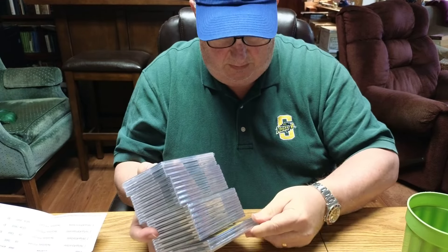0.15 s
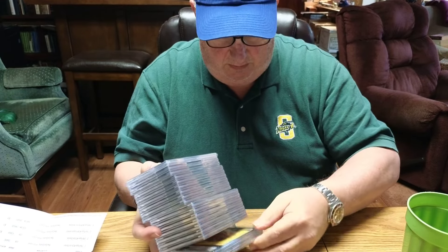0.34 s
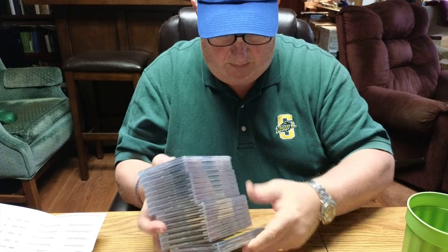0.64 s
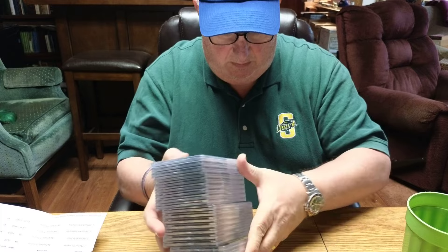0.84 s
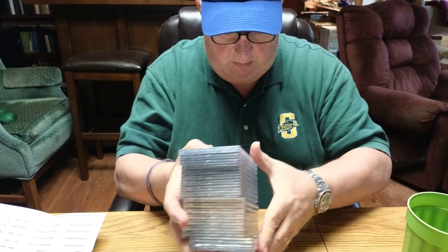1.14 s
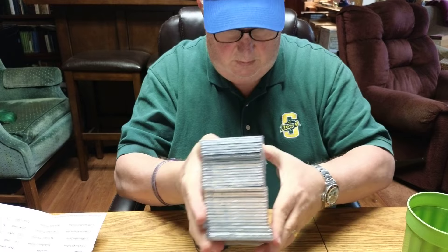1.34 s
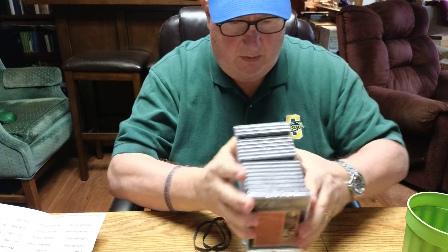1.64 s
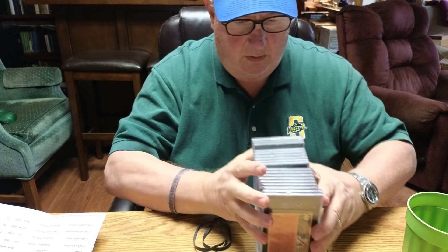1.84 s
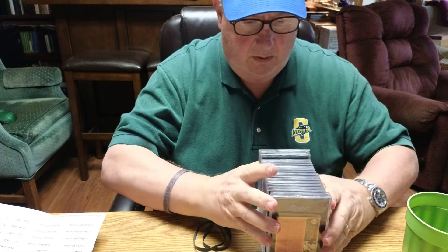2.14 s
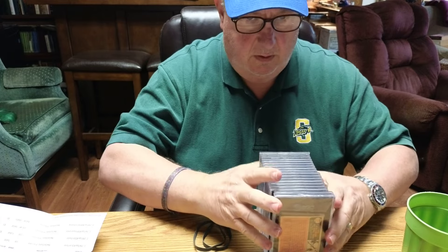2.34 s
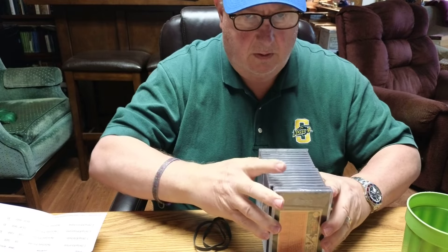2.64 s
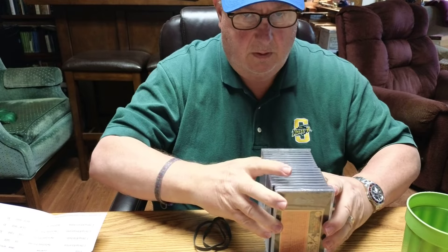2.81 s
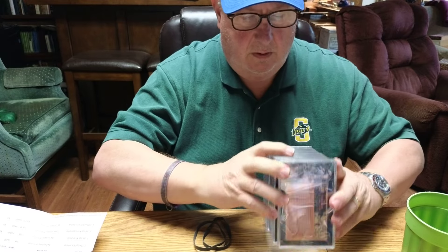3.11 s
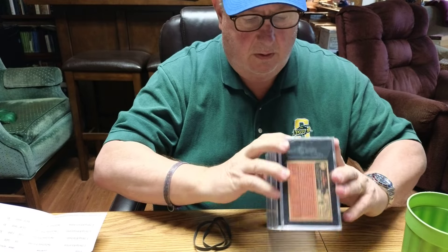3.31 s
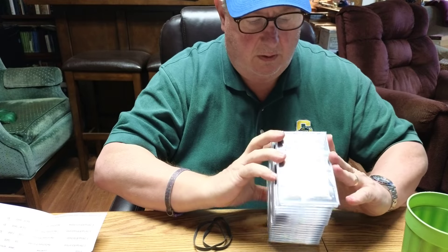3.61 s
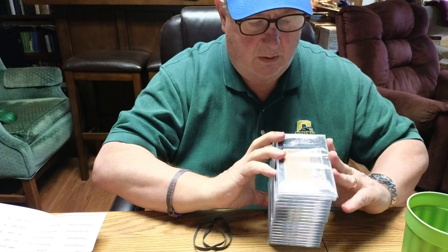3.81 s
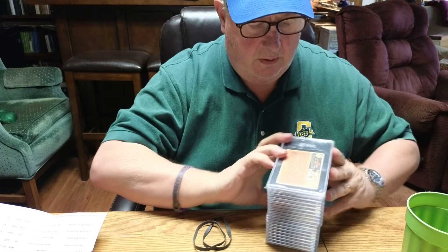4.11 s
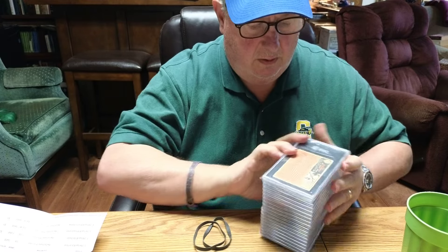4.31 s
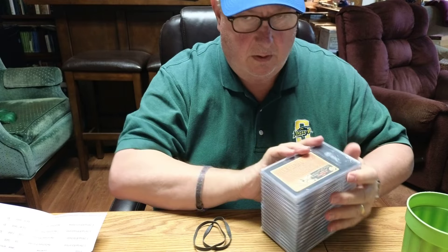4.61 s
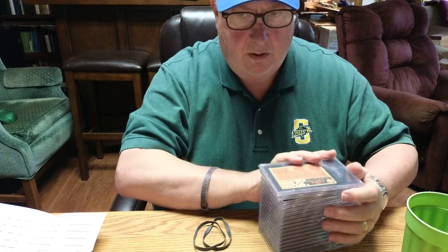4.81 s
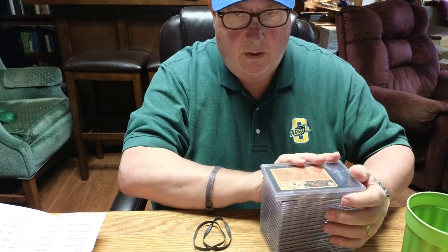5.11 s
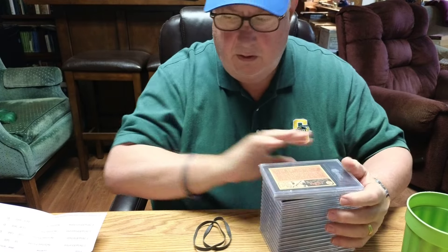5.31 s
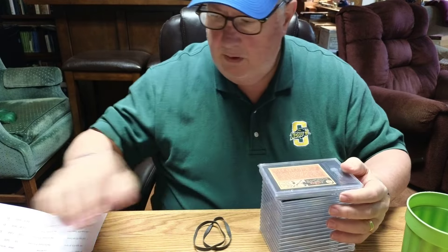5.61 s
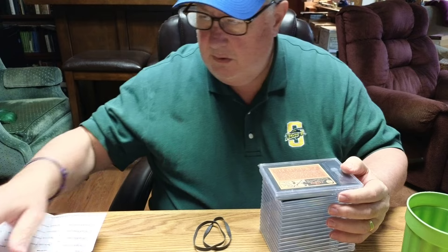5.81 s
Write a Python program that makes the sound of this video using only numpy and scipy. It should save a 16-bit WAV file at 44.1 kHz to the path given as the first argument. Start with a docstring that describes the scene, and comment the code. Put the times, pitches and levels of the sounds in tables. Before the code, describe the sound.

Rigid plastic cases tick and rattle as fingers square the stack. A bright clack comes early, several solid knocks on wood follow, then grainy drags across the tabletop. After a quieter spell of rubbing and clicks, the stack is set down hardest, with a deep thud. Faint taps and a whisper of paper end it. Quiet room noise with slight hum, short reverberation, table-mounted microphone.

```python
"""A stack of hard plastic card holders is squared, knocked and slid on a wooden table in a furnished room.
Ticks and knocks open; hard knocks come at 1.9-2.3 s, with a short creak between them near 2.17 s.
Slides follow at 2.4-2.8 s and 3.05-3.6 s, the heaviest knock at 4.7 s, a sliding sheet of paper from 5.7 s.
Contacts tick at case edges, ring plates and stack, and thump the table top, which carries the microphone.
Throughout, fingers rub the cases, forearms shift on the table and something hums faintly in the room noise."""
import sys
import numpy as np
from scipy import signal
from scipy.fft import rfft, irfft, next_fast_len
from scipy.io import wavfile
from scipy.ndimage import uniform_filter1d, map_coordinates

SR = 44100
rng = np.random.default_rng(int(sys.argv[2]) if len(sys.argv) > 2 else 0)


def inscribe(sig):
    """Save sig as 16-bit PCM at rate SR to the path in sys.argv[1].

    A 1-D sig is mono; a 2-D sig holds one channel per row.
    Samples are clipped to [-1, 1] before scaling.
    """
    pcm = np.round(np.clip(np.atleast_2d(sig).T, -1, 1) * 32767)
    wavfile.write(sys.argv[1], SR, pcm.astype(np.int16))


N = 262392

# stack or case knocks on table or pile: (time [s]; level over 10 ms of corner, edge, plate, stack, table [dB];
# favoured plate pitch [Hz], favoured stack pitch [Hz], contact length [s])
KNOCKS = [(0.0333, -61, -41, -40, -68, -47.5, 1840, 1390, .004),
          (0.048, -62, -62, -44, -44.5, -55, 1780, 1130, .008),
          (0.0596, -59, -53, -63, -43, -73, 1730, 330, .004),
          (0.814, -36.5, -30, -26, -23, -34.5, 2000, 545, .003),
          (0.885, -81, -63, -54.5, -41, -61, 3010, 467, .0045),
          (0.9079, -82, -65, -48.5, -49.5, -72, 2110, 320, .0045),
          (1.2082, -97, -72, -63, -54, -91, 1810, 615, 0.0061),
          (1.2182, -88.5, -63.5, -54, -45, -81.5, 1652, 570, .0045),
          (1.868, -95, -81, -53.5, -50, -69.5, 1600, 894, .006),
          (1.8883, -56.5, -44.5, -30, -14, -21.5, 1590, 1193, .0022),
          (1.966, -66, -53, -49.5, -24.5, -27, 1610, 486, .003),
          (2.0303, -59, -51.5, -27.5, -14, -17.5, 1560, 540, .0033),
          (2.049, -61.5, -46, -46, -29.5, -26.5, 2033, 555, .002),
          (2.1308, -81.5, -63, -58, -51.5, -46, 2190, 427, .006),
          (2.2473, -61, -47, -38, -44, -49, 3420, 1400, .004),
          (2.2684, -62.5, -43, -40, -26.5, -66, 1750, 1290, .002),
          (2.2725, -58.5, -53, -23.5, -16, -20, 1670, 980, .004),
          (2.3077, -71, -53.5, -52, -35.5, -51, 1670, 610, .005),
          (2.544, -63, -60.5, -66.5, -47, -27, 1640, 260, .0035),
          (2.6116, -66, -53.5, -73.5, -44, -31.5, 4480, 260, .006),
          (3.4142, -64, -44.5, -55, -37, -60, 1530, 920, .004),
          (4.0001, -74, -51, -51, -57.5, -62, 1920, 330, .005),
          (4.073, -80, -48.5, -35, -35.5, -76, 2010, 822, .006),
          (4.52, -87.5, -68.5, -60, -56.5, -58.5, 2630, 940, .012),
          (4.5522, -81, -70, -59.5, -57, -64, 1710, 895, .008),
          (4.657, -88.5, -70.5, -55.5, -55, -69.5, 2294, 600, 0.012),
          (4.6787, -50, -39, -26, -22.5, -33.5, 2207, 402, .0035),
          (4.7327, -40, -27.5, -18.5, -17, -10.5, 2300, 375, .0033),
          (4.7868, -62.5, -50, -45, -37, -49, 1800, 259, .005),
          (5.208, -59, -51, -37.5, -40, -44.5, 1980, 745, .005),
          (5.2382, -80, -61, -48.5, -52, -48.5, 1950, 610, .0045),
          (5.299, -79, -54, -37.5, -42.5, -61, 2780, 704, .005)]
# case edges tick, the one at 2.874 s a faint repeat of the 2.851 s tick: (time [s]; level over 10 ms of edge,
# corner, plate [dB]; favoured plate pitch [Hz])
TICKS = [(0.0046, -44.5, -60.5, -52.5, 1600), (0.015, -55, -76, -49, 1630),
         (0.0301, -31, -45.5, -42.5, 1850), (0.0969, -59.5, -64, -57.5, 1750),
         (0.1897, -79, -83, -60, 2120), (0.475, -51.5, -67, -65, 1730), (0.4832, -41, -46.5, -54.5, 1550),
         (0.738, -61.5, -83, -50, 1614), (0.796, -61.5, -74.5, -61.5, 3600),
         (1.315, -70, -72.5, -73.5, 4300), (1.5383, -57.5, -100.5, -52, 2290),
         (1.7028, -59, -88.5, -81, 4480), (1.745, -81.5, -100, -68, 1690),
         (1.918, -51.5, -59.5, -57.5, 1550), (2.1012, -58, -72, -56, 1480), (2.1089, -62.5, -81, -58, 1840),
         (2.3346, -56, -76, -76, 1640), (2.461, -51.5, -69, -84, 4240), (2.6489, -59, -85.5, -79, 4450),
         (2.6834, -56.5, -74.5, -78.5, 4420), (2.8507, -45, -51, -75.5, 3700),
         (2.874, -61, -68.5, -70.5, 4310), (3.5121, -63.5, -80.5, -85, 1600),
         (3.8907, -70.5, -69, -82.5, 1910), (3.9086, -43.5, -40.5, -91, 3450),
         (3.948, -47.5, -45, -67.5, 3480), (4.265, -52, -65.5, -72, 4260), (4.2697, -54, -64, -68, 4480),
         (4.5357, -52.5, -64, -60, 2970), (5.131, -73.5, -86, -63.5, 1700), (5.1643, -51, -64, -81, 4490),
         (5.1807, -41, -52, -66, 4530), (5.4, -41.5, -46.5, -66.5, 4320), (5.6472, -61, -58, -82, 2954),
         (5.7416, -65.5, -74, -74.5, 1590), (5.7742, -57, -56, -80.5, 2800),
         (5.8467, -64.5, -60.5, -69, 3230), (5.93, -64.5, -83.5, -59, 2800)]
# resonances of table top, stack, plates, edges, corners: (frequency [Hz], width [Hz], relative level [dB])
TABLE_MODES = [(35.2, 12, -17), (103.4, 18, 3.5), (128, 25, 2.5), (255, 110, -4.5)]
STACK_MODES = [(346, 150, 1), (536.4, 56, -1), (624, 67, 1.5), (753, 19, 1.5), (914, 130, -4),
               (1270, 99, 1.5), (1400, 53, -5.5)]
PLATE_MODES = [(1605, 350, 1.5), (1728.5, 220, 3), (1998, 110, -3), (2176, 84, -4), (2660, 200, -9),
               (3054, 360, -0.5), (3260, 200, 2.5), (3600, 250, -6), (4250, 300, 1)]
EDGE_MODES = [(4560, 230, 3.5), (5520, 4000, 2), (6200, 1800, -0.5), (6800, 930, -3), (8330, 2000, 6.5)]
CORNER_MODES = [(9775, 470, 5), (12200, 1000, 2), (14100, 720, -8.5)]
# table frame, booms under heavy knocks: (frequency [Hz], width [Hz], relative level [dB])
FRAME_MODES = [(96, 18, -0.5)]
FRAME_WAKE_DB, FRAME_GROW_DB_PER_DB = -16, 2.6  # knock level where the frame gain is 0 dB; its growth
KNOCK_EDGE_HZ = 5700
KNOCK_NARROW_DB_PER_OCT, BROADER_PER_DB = 2, 0.3873  # focus at 0 dB; heavier knocks spread wider
TICK_NARROW_DB_PER_OCT, TICK_S, TICK_RATTLE_S = 13, .0016, .006
TICK_EDGE_HZ, DULLER_HZ_PER_DB = 7800, 90  # at corner = edge level; lower as the corner weakens
TICK_STACK_DB, TICK_STACK_HZ = -11, 450  # level relative to the plate


def contacts():
    """Each contact ticks at corners and edges, rattles plates and stack; a knock also gives the table one soft push."""
    size = 16384
    hz = np.fft.rfftfreq(size, 1 / SR)
    cases, table = np.zeros((2, N + size))
    rows = []
    for s, corner_db, edge_db, plate_db, stack_db, _, plate_hz, stack_hz, length_s in KNOCKS:
        levels_db = [corner_db, edge_db, plate_db, stack_db]
        narrow_db = KNOCK_NARROW_DB_PER_OCT - BROADER_PER_DB * max(stack_db, plate_db)
        rows.append((s, levels_db, KNOCK_EDGE_HZ, plate_hz, stack_hz, narrow_db, length_s, .7 * length_s))
    for s, edge_db, corner_db, plate_db, plate_hz in TICKS:
        levels_db = [corner_db, edge_db, plate_db, plate_db + TICK_STACK_DB]
        edge_hz = TICK_EDGE_HZ + DULLER_HZ_PER_DB * (corner_db - edge_db)
        rows.append((s, levels_db, edge_hz, plate_hz, TICK_STACK_HZ,
                     TICK_NARROW_DB_PER_OCT, TICK_RATTLE_S, TICK_S))
    for row, draw in zip(rows, rng.standard_normal((len(rows), 5, size))):
        s, levels_db, edge_hz, plate_hz, stack_hz, narrow_db, rattle_s, tick_s = row
        tick, rattle = burst(draw[0], tick_s), burst(draw[1], rattle_s)
        corner = modes(CORNER_MODES)(hz) * small(hz, 9000) * soft(hz, 16000) * tick
        edge = struck(EDGE_MODES, edge_hz, narrow_db, draw[2], hz)
        edge = edge * small(hz, 5700) * soft(hz, 1.8 * edge_hz) ** 2 * tick
        plate = struck(PLATE_MODES, plate_hz, narrow_db, draw[2, 10:], hz) * soft(hz, 5800) * rattle
        stack = struck(STACK_MODES, stack_hz, narrow_db, draw[2, 20:], hz) * soft(hz, 2500) * rattle
        ring = sum(map(sized, [corner, edge, plate, stack], levels_db))
        cases[round(s * SR):][:size // 2] += ring + clatter(draw[3:], levels_db, hz)
    for s, table_db in np.array(KNOCKS)[:, [0, 5]]:
        frame = amp(FRAME_GROW_DB_PER_DB * (table_db - FRAME_WAKE_DB)) * modes(FRAME_MODES)(hz)
        thump = (modes(TABLE_MODES)(hz) - frame) * soft(hz, 330)
        table[round(s * SR):][:size // 2] += sized(thump, table_db)
    return cases[:N], table[:N]


def struck(table, spot_hz, narrow_db, scatter, hz):
    """Resonances strongest near the favoured pitch; broad blows press the cases together and damp them."""
    narrow_db = max(narrow_db, 2)
    centre, width, db = np.transpose(table)
    octaves = np.abs(np.log2(centre / spot_hz))
    nearest = .7 * np.exp(-(octaves / .12) ** 2)  # the mode under the spot stands out
    found_width = width * (10 / narrow_db) ** 0.43
    found_db = db + narrow_db * (nearest - octaves) + 2.1 * scatter[:len(db)]
    return modes(np.transpose([centre, found_width, found_db]))(hz)


def burst(draw, length_s):
    """Spectrum of many tiny impacts that swell at once and die away, chance peaks partly evened out."""
    u = np.arange(len(draw)) / SR / max(length_s / 3.1, .00005)
    spectrum = rfft(draw * np.sqrt(u) * np.exp(-u))
    return spectrum / np.abs(spectrum) ** .4


# centres of the corner, edge, plate, stack ranges: (frequency [Hz])
CLATTER_HZ = [12000, 6200, 2500, 750]
CLATTER_DB, CRACK_DB = -7.5, -7.5  # relative to the scaled contact level
CLATTER_T60_S, LONGER_PER_DB, MORE_PER_DB = 0.2, .01, 0.12  # at 0 dB; light contacts: shorter, weaker


def clatter(draw, levels_db, hz):
    """A broad crack, then loose cases chatter in uneven grains, coloured like the struck parts without peaks."""
    t = np.arange(len(hz) - 1) / SR
    total_db = 10 * np.log10(np.sum(amp(levels_db) ** 2))
    per_hz = [(c, db - 10 * np.log10(c)) for c, db in zip(CLATTER_HZ, levels_db)][::-1]
    colour = amp(along(per_hz, hz)) * np.abs(small(hz, 200)) / (1 + (hz / 14000) ** 6)
    t60_s = CLATTER_T60_S * np.exp(LONGER_PER_DB * total_db)
    uneven_db = 4 * np.repeat(draw[1, :len(t) // 64], 64)
    grains = amp(uneven_db - 60 * t / t60_s) * (1 - np.exp(-t / .003))
    crack = t * np.exp(-t / 0.00075)
    onset = np.minimum(np.arange(len(draw[0])) / SR / 0.00099, 1) ** 2

    def shaped(envelope):
        """Coloured noise under an envelope, its onset softened."""
        coloured = irfft(rfft(draw[0, :len(t)] * envelope, len(draw[0])) * colour)
        return rfft(coloured * onset)

    share_db = (1 + MORE_PER_DB) * total_db
    return sized(shaped(grains), share_db + CLATTER_DB) + sized(shaped(crack), share_db + CRACK_DB)


# stack on wood, one list per slide: (time [s], pressure [dB], speed [cm/s])
SLIDES = [
    [(2.4, -53, 5), (2.42, -62.5, 3.1), (2.508, -36, 5.4), (2.544, -35.5, 7.5), (2.6, -40, 11.5),
     (2.63, -46, 9.4), (2.692, -40.5, 3.6), (2.734, -55.5, 2.7), (2.78, -72, 4)],
    [(3.05, -66, 4.3), (3.092, -52, 3), (3.114, -35, 3.5), (3.172, -39.5, 10.6), (3.268, -35.5, 22.2),
     (3.34, -39, 16.1), (3.4, -40.5, 16.3), (3.466, -38, 16.4), (3.526, -49, 8), (3.58, -80, 6)],
]
# table boom, lower stack, upper stack, low plate, high plate: (level [dB])
PART_DB = [2.5, -1, 3.5, 0, -2.5]
GRAINS_PER_CM = 40
UNDER_DB, OVER_DB, CURVE = 5, 8.5, 1.5  # loss one octave under/over the grain rate; power of octaves


def slides():
    """Wood grain drags at the stack: slow sliding shakes the table, faster reaches higher resonances."""
    fade, (pressure_db, speed_cm_s) = strokes(SLIDES)
    catch_db = pressure_db + 1.13 * wobble(90)
    parts = [TABLE_MODES[1:3], TABLE_MODES[3:] + STACK_MODES[:2], STACK_MODES[2:],
             PLATE_MODES[:4], PLATE_MODES[4:8]]
    grain_hz = np.maximum(speed_cm_s * GRAINS_PER_CM, 1)
    out = 0
    for part, part_db in zip(parts, PART_DB):
        octaves = np.log2(np.mean(part, axis=0)[0] / grain_hz)
        reach_db = -np.where(octaves > 0, OVER_DB, UNDER_DB) * np.abs(octaves) ** CURVE
        gain = amp(catch_db + part_db + reach_db + 1.1 * wobble(25.14))
        out = out + gain * noise(lambda f: np.abs(modes(part)(f) * soft(f, 1.01 * part[-1][0])) ** 0.81)
    return fade * out


# fingers and cases rub: (peak time [s], swell [s], fade [s], level [dB], brightness [-5 dull to 5 bright, clipped])
RUBS = [(0.334, 0.11, .1, -82.5, 9), (0.7, 0.29, 0.18, -71.5, 7), (0.758, .04, .1, -67, -3.5),
        (0.921, 0.014, 0.063, -59.5, -4), (1.031, 0.062, 0.059, -45.5, 3.5), (1.195, 0.041, 0.037, -73, 0),
        (1.25, .05, .07, -74, 0.5), (1.56, 0.017, .06, -57.5, -15.5), (1.63, 0.25, .1, -72, -1.5),
        (1.93, 0.1, .1, -57.5, 7.5), (2.06, 0.032, .09, -59.5, 2), (2.15, .15, .12, -62, -1.5),
        (2.468, 0.007, 0.089, -61, 6.5), (2.6, .22, 0.16, -51.5, 9), (3.3, 0.16, .2, -54, 15),
        (3.41, 0.06, .26, -60, 4.5), (3.631, 0.024, 0.073, -44.5, 8.5), (3.94, .05, 0.077, -52.5, 8),
        (4.715, .1, .05, -43.5, -2), (5.14, .02, 0.03, -64, 1.5), (5.19, 0.051, .05, -55, 7.5)]
# base colour of rubbing: (frequency [Hz], relative level per Hz [dB])
SKIN = [(880, -18.5), (1500, -5), (2660, -25.5), (3150, -8), (3690, -22.5), (4590, -14), (5280, -9),
        (12700, -20.5), (16000, -50)]
# depth of the random bands in rubbing: (frequency [Hz], depth [dB])
BANDING = [(1000, 8), (4000, 7), (8000, 5), (14000, 2)]


def rubs():
    """Skin and plastic catch and let go: grainy hiss whose narrow bands come and go."""
    gains = np.array([swell(*row[:4]) for row in RUBS])
    gain = gains.sum(axis=0)
    brightness = np.clip(.5 + np.array(RUBS)[:, -1] / 10, 0, 1)
    share = brightness @ gains / (gain + 1e-12)
    body = modes(STACK_MODES[2:] + PLATE_MODES + EDGE_MODES[:2])
    high = noise(lambda f: amp(along(SKIN, f)) * f / 8000)
    low = noise(lambda f: amp(along(SKIN, f)) * np.abs(body(f)))
    z = signal.stft(np.sqrt(share) * high + np.sqrt(np.abs(1 - share)) * low, nperseg=256)[2]
    field = uniform_filter1d(rng.standard_normal(z.shape), size=3, axis=0)
    field = uniform_filter1d(field, size=16, axis=1)
    depth_db = along(BANDING, np.fft.rfftfreq(256, 1 / SR))[:, None]
    banded = signal.istft(z * amp(depth_db * unit(field)), nperseg=256)[1][:N]
    grains = amp(2.5 * wobble(250) + 1.5 * wobble(40))
    return gain * unit(grains * banded)


CREAK_START_S, CREAK_END_S, SLIPS_PER_S, SLIP_DB = 2.158, 2.192, 175, -57  # median level per slip


def creak():
    """Two cases stick and slip: a short uneven run of ticks through edges and plates."""
    hz = np.fft.rfftfreq(2048, 1 / SR)
    edge = modes(EDGE_MODES)(hz) * small(hz, 4000) * soft(hz, 12000)
    slip = sized(edge + 1.507 * modes(PLATE_MODES[::3])(hz), SLIP_DB)
    times = np.arange(CREAK_START_S, CREAK_END_S, 1 / SLIPS_PER_S)
    draw = rng.standard_normal((len(times), 2))
    slips = np.zeros(N)
    slips[((times + .0006 * draw[:, 0]) * SR).astype(int)] = amp(2.5 * draw[:, 1])
    return signal.fftconvolve(slips, slip)[:N]


# a hand pushes a sheet: (time [s], level [dB])
PAPER = [
    [(5.68, -78.5), (5.714, -77.5), (5.926, -63), (5.932, -64.5), (5.95, -51.5)],
]
# resonances of the sheet: (frequency [Hz], width [Hz], relative level [dB])
SHEET_MODES = [(1270, 57, -4), (1600, 60, -1), (2730, 100, -3), (3240, 64, 0), (3980, 50, -2),
               (4660, 72, -9), (6500, 2000, -16)]


def paper():
    """The sheet sings faintly in narrow bands as it slides."""
    fade, (level_db,) = strokes(PAPER)
    return fade * amp(level_db + 2.8 * wobble(50)) * noise(modes(SHEET_MODES))


# forearms and heavy knocks rock the table: (peak time [s], level [dB], fade [s])
ARMS = [(0.14, -42.5, 0.16), (0.4, -60, 0.34), (0.83, -40.5, 0.1), (1.13, -58.5, 0.21), (1.34, -55.5, 0.11),
        (1.9, -39, 0.29), (2.07, -29.5, .13), (2.27, -44.5, .1), (2.55, -59, .2), (2.7, -55.5, .13),
        (3.98, -41.5, 0.3), (4.74, -22.5, 0.1), (4.91, -51, .2), (5.22, -63, .5), (5.82, -70.5, .2)]
ARM_SWELL_S, ARM_REST_DB = .07, -74


def arms():
    """Slow rocking reaches the microphone through its stand."""
    rocking = noise(lambda f: (f / 25) ** 2 / (1 + (f / 35) ** 4))
    swells = sum(swell(s, ARM_SWELL_S, fade_s, db) for s, db, fade_s in ARMS)
    return (amp(ARM_REST_DB) + swells) * rocking


# room and microphone noise: (frequency [Hz], relative level per Hz [dB])
AIR = [(12, -25), (20, -16), (77, -12.5), (128, -5.5), (351, -6), (416, -6.5), (465, -7.5), (1140, -21),
       (1390, -19.5), (3940, -32.5), (7100, -32), (14700, -54), (16500, -47.5)]
# narrow hum: (frequency [Hz], width [Hz], level [dB])
HUM = [(132, 5.8, -67.5), (448, 7.7, -80.5)]
AIR_DB = -66


def air():
    """Gently wavering room noise with a faint hum of narrow noise bands."""
    hum = sum(amp(db) * noise(modes([(hz, width_hz, 0)])) for hz, width_hz, db in HUM)
    return amp(AIR_DB + 1.2 * wobble(2.7)) * noise(lambda f: amp(along(AIR, f))) + hum


WALL_DELAY_S, WALL_DB = 0.019, -18.5


def wall(x):
    """A hard surface nearby returns one delayed, bass-less copy."""
    return filtered(x, lambda f: amp(WALL_DB) * f / (f + 4000) * np.exp(-2j * np.pi * f * WALL_DELAY_S))


# reverberation: (frequency [Hz], t60 [s])
ROOM = [(100, 0.32), (400, 0.11), (1100, 0.1), (3000, 0.052), (8000, 0.048), (15000, 0.019)]


def room(x):
    """Diffuse answer of the room, a new decaying-noise tail for each short stretch."""
    out, step = np.zeros(N + SR), SR // 5
    for at in range(0, N, step):
        hz, t, z = signal.stft(rng.standard_normal(SR // 2), SR, nperseg=256)
        tail = signal.istft(z * amp(-60 * t / along(ROOM, hz)[:, None]), SR, nperseg=256)[1]
        wet = signal.fftconvolve(x[at:at + step], tail / np.linalg.norm(tail))
        out[at + 130:][:len(wet)] += wet
    return out[:N]


def amp(db):
    """Gain of a dB value."""
    return 10 ** (np.asarray(db) / 20)


def unit(x):
    """Scaled to rms 1."""
    return x / np.sqrt(np.mean(x ** 2) + 1e-20)


def along(points, hz):
    """(frequency [Hz], value) points interpolated on a log axis."""
    f, v = np.transpose(points)
    return np.interp(np.log(hz + 1), np.log(f + 1), v)


def strokes(tables):
    """Gain (silent between the tables) and further columns, one value per sample."""
    t = np.arange(N) / SR
    rows = np.vstack(tables)
    inside = sum((t >= table[0][0]) & (t <= table[-1][0]) for table in tables) > 0
    fade = np.abs(uniform_filter1d(inside * 1., size=600))
    return fade, [np.interp(t, rows[:, 0], column) for column in rows[:, 1:].T]


SWELL_RANGE_DB, ROUNDNESS = 30, 0.89  # loss over the swell or fade; 1 = pointed peak, 2 = rounded


def swell(peak_s, swell_s, fade_s, level_db):
    """Gain that climbs to a peak and sinks again."""
    t = np.arange(N) / SR - peak_s
    return amp(level_db - SWELL_RANGE_DB * np.maximum(-t / swell_s, t / fade_s) ** ROUNDNESS)


def wobble(rate_hz):
    """A smooth random curve, rate_hz knots a second."""
    knots = rng.standard_normal(int(N * rate_hz / SR) + 4)
    return map_coordinates(knots, [np.arange(N) * rate_hz / SR])


def filtered(x, response):
    """x times a complex response of frequency."""
    m = next_fast_len(N + SR // 2)
    return irfft(rfft(x, m) * response(np.fft.rfftfreq(m, 1 / SR)), m)[:N]


def modes(table):
    """Causal response of a set of resonances with alternating signs."""
    def response(f):
        """Sum of the resonances at frequency f."""
        return sum((-1) ** k * amp(db) * 1j * f * w / (c * c - f * f + 1j * f * w)
                   for k, (c, w, db) in enumerate(table))
    return response


def noise(response):
    """Coloured noise of rms 1."""
    return unit(filtered(rng.standard_normal(N), response))


def sized(spectrum, level_db):
    """The sound of a spectrum, faded out, with the energy of 10 ms at the level."""
    x = irfft(spectrum)
    x = x[:len(x) // 2] * np.hanning(len(x))[len(x) // 2:]
    return amp(level_db) * np.sqrt(SR / 100) * x / np.linalg.norm(x)


def soft(hz, corner_hz):
    """A finite contact time dulls everything above the corner."""
    return 1 / (1 + 1j * hz / corner_hz) ** 3


def small(hz, corner_hz):
    """Small parts radiate little below the corner."""
    return (1j * hz / (corner_hz + 1j * hz)) ** 3


def scene():
    """Airborne sounds with their room, table-borne ones nearly dry."""
    clacks, thumps = contacts()
    airborne = clacks + rubs() + creak()
    space = wall(airborne) + amp(-7) * room(airborne + amp(-4.5) * thumps)
    return (airborne + space + thumps + slides() + paper() + arms() + air())[None]


TOP_HZ, PEAK_LIMIT = 16667, .8


def record(dry):
    """Rounds off the loudest peaks and keeps nothing above the band limit."""
    rounded = dry[0] / (1 + np.abs(dry[0] / PEAK_LIMIT) ** 6) ** (1 / 6)
    return filtered(rounded, lambda hz: hz < TOP_HZ)[None]


dry = scene()
out = record(dry)
inscribe(out)
```